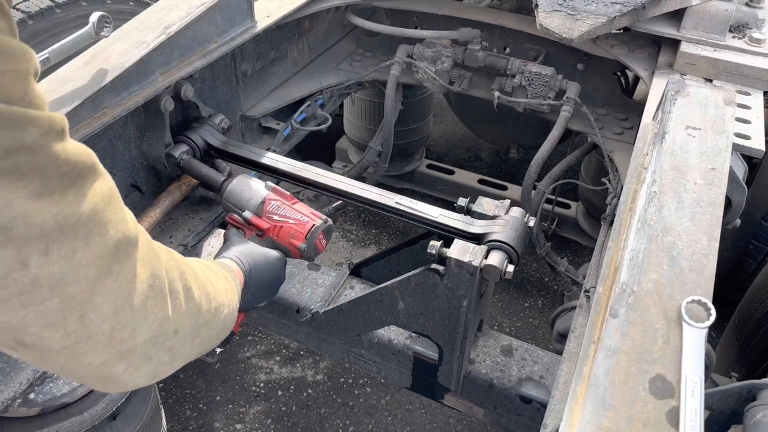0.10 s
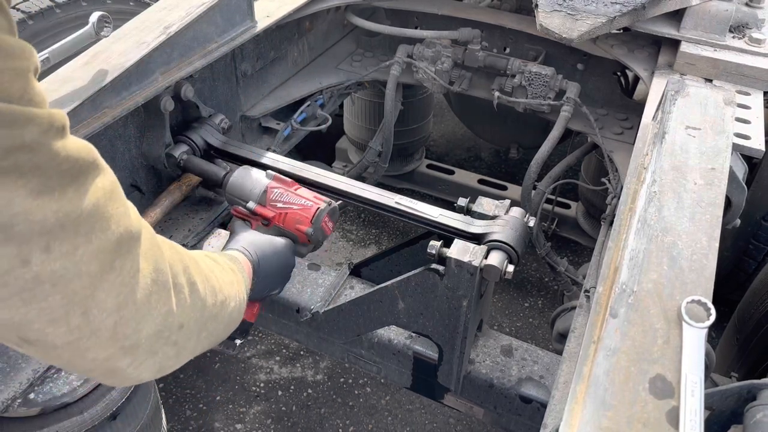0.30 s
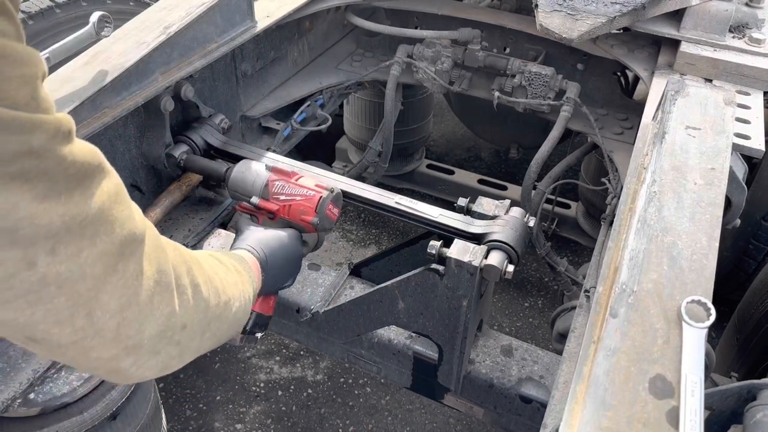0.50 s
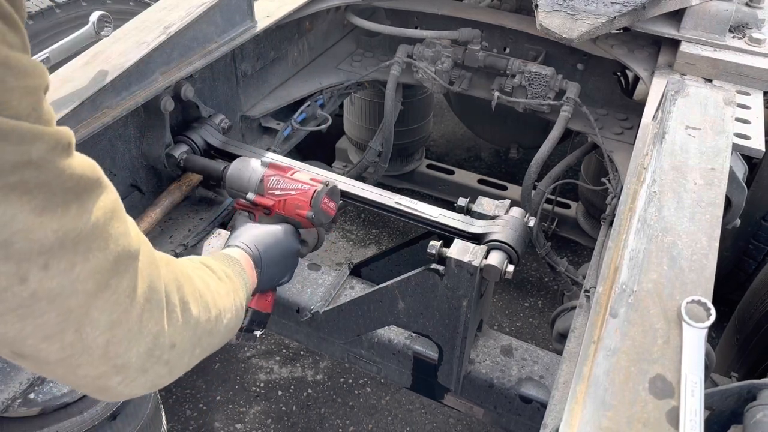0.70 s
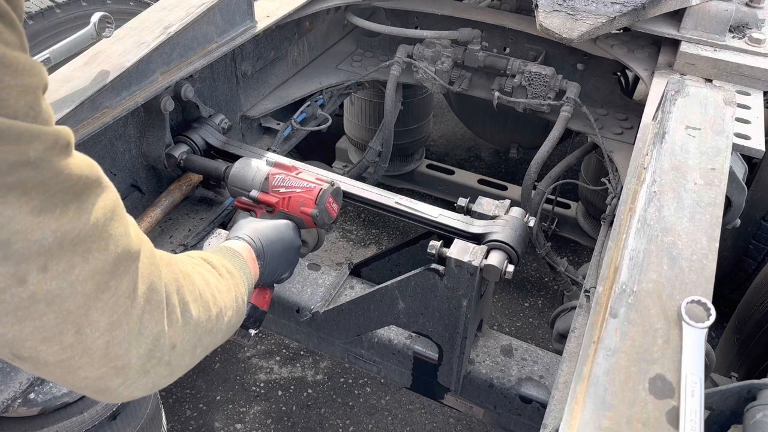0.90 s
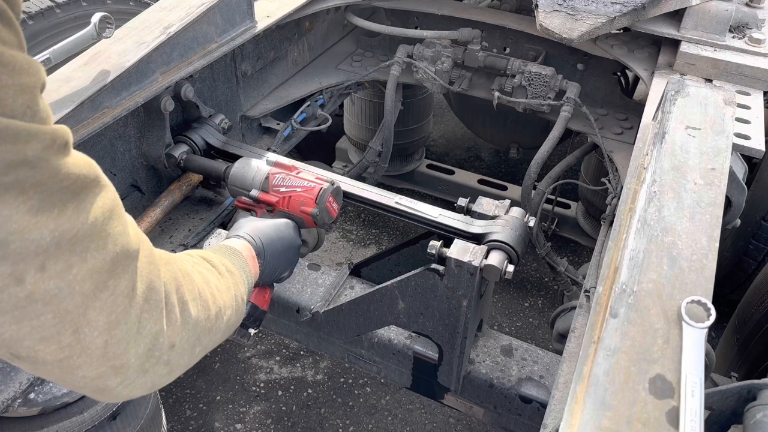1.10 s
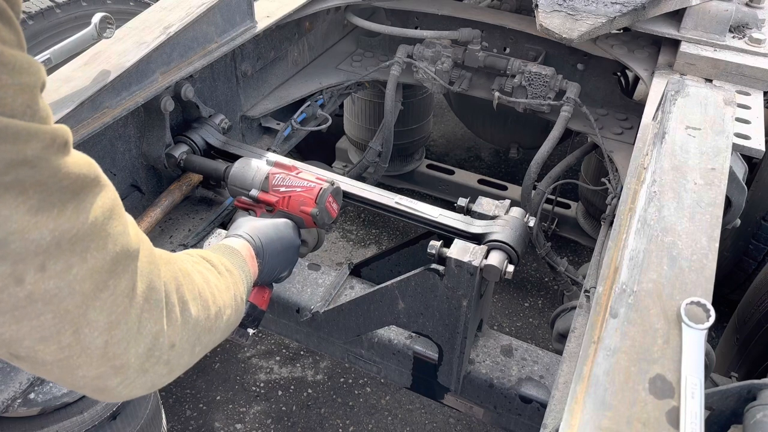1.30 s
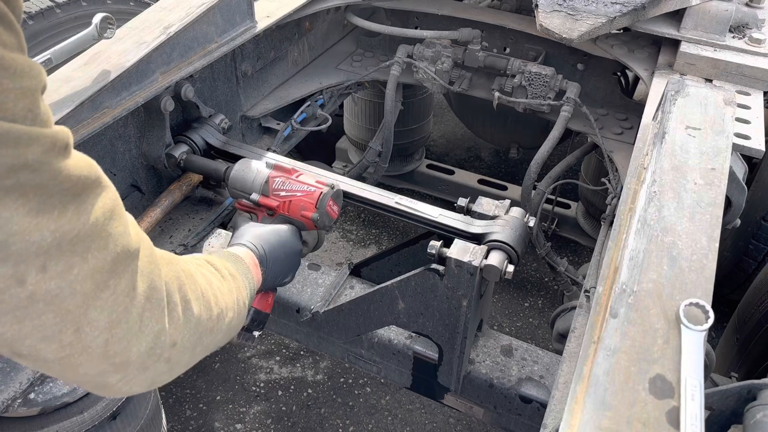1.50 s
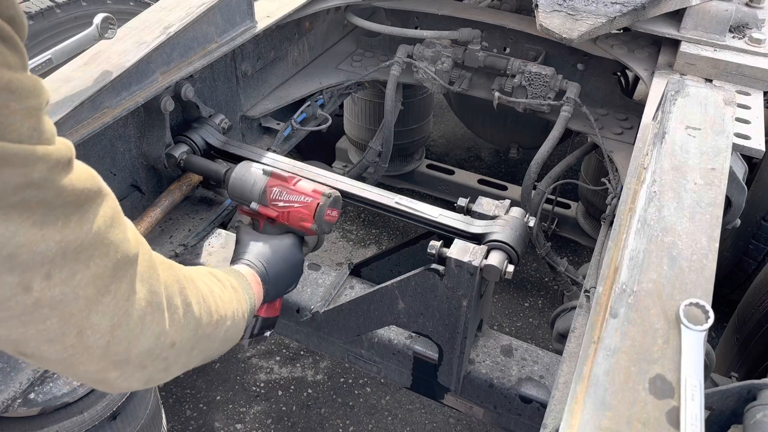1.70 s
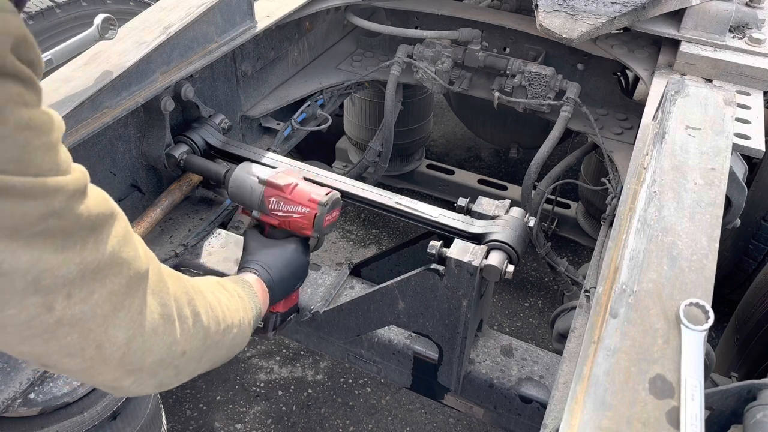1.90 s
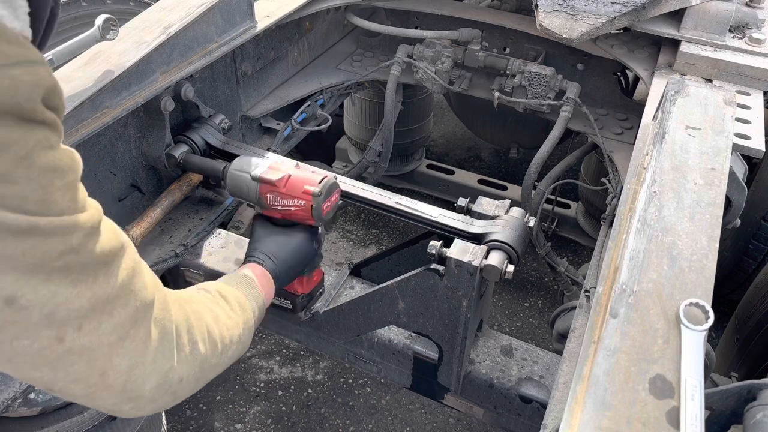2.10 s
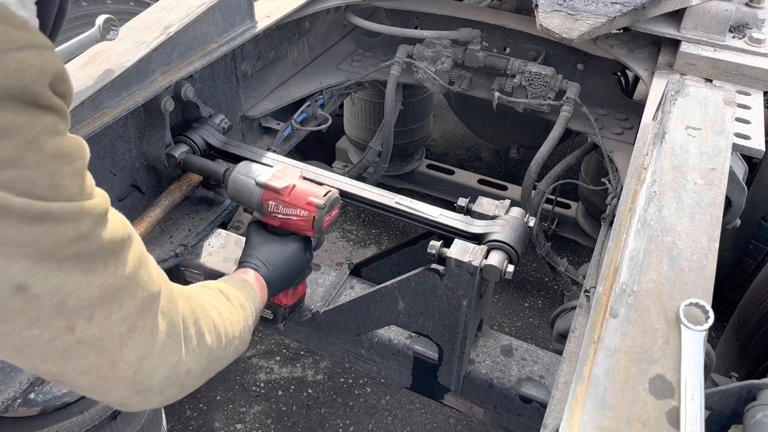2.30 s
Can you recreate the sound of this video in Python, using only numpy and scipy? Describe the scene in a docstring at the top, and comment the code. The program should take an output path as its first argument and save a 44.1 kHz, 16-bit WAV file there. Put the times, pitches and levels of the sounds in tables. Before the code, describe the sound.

A cordless impact wrench fires one short hammering burst on steel, amid socket knocks and wind

```python
"""Outdoors, a socket knocks against a bolt on a steel truck frame as wind buffets the microphone.
After a faint trigger or motor noise a cordless impact wrench whines up and lands seven hammer blows;
looser knocks and gusts follow. A far hum of air and a thin steady whine run throughout. Wind, air and
frame rattle are banded noise; steel and frame are decaying sines; the motor is a beating tone with
hissing gear resonances."""
import sys
import numpy as np
from scipy import signal
from scipy.fft import rfft, irfft
from scipy.io import wavfile

SR = 44100
rng = np.random.default_rng(int(sys.argv[2]) if len(sys.argv) > 2 else 0)


def put_to_file(sound):
    """Save the sound as 16-bit audio at rate SR, in the file named by the first command-line argument."""
    columns = np.atleast_2d(sound).T  # one column per channel
    safe = np.clip(columns, -1, 1)
    whole_steps = np.round(safe * 32767)
    wavfile.write(sys.argv[1], SR, whole_steps.astype(np.int16))


def invert_db(x):
    """Field ratio 10**(x/20) for x, a level in decibels (scalar or array-like)."""
    u = np.asarray(x, float) / 20
    return 10 ** u


N = 110250
T = np.arange(N) / SR

# socket knocks, and a faint trigger or motor noise at 0.748 s, made the same way:
# (time [s], relative level [dB], brightness [dB/octave], relative clear ring [dB])
SMALL_HITS = [(.002, -35.5, -3, 1), (0.015, -28, 3, -23), (.079, -27.5, 1, -12), (.2702, -14, -0.35, -48),
              (0.322, -26.5, 0.5, -21), (.379, -28.5, -4.5, -46), (0.445, -43.5, -1.5, -33),
              (.607, -31, -7.5, -38.5), (0.748, -43, 5.5, -19.5), (1.403, -44, 3.5, -24.5),
              (1.781, -21.5, 4, -11.5), (1.852, -48.5, 3, -7), (2.101, -41, 0, -42),
              (2.1197, -28, -0.5, -17.5), (2.157, -47, -4.5, -38), (2.462, -41.5, -3.5, -30)]
# hammer blows: (time [s], relative level [dB], relative thud [dB])
BLOWS = [(0.98, -11.5, -34), (1.0026, -8.5, -28.5), (1.0319, -8.5, -24.5), (1.059, -9.5, -27),
         (1.082, -11.5, -23), (1.11, -10, -33), (1.1368, -10, -23.5)]
CLATTER_DB, CLATTER_HZ = 2, 262   # loose parts make the ringing grainy


def rms_one(x):
    """Scale to rms 1."""
    return x / np.sqrt(np.mean(x ** 2) + 1e-20)


def at_hz(points, hz):
    """Read a table on a log-frequency axis."""
    table_hz, value = np.transpose(points)
    return np.interp(np.log(hz), np.log(table_hz), value)


def drift(rate_hz):
    """Low-passed noise of spread 1, computed at every 40th sample and interpolated."""
    hop = 40
    r = np.exp(-2 * np.pi * rate_hz * hop / SR)
    white = rng.standard_normal(N // hop + 1002)
    slow = signal.lfilter([1], [1, -2 * r, r * r], white)[1000:]
    return np.interp(np.arange(N) / hop, np.arange(len(slow)), rms_one(slow))


def clicks(time_s, size):
    """Impulses at given times, over a tiny floor."""
    out = np.zeros(N)
    np.add.at(out, np.clip((np.asarray(time_s) * SR).astype(int), 0, N - 1), size)
    return out + 1e-18


def fade(x, t60_s):
    """Each impulse becomes an exponentially dying envelope."""
    return signal.lfilter([1], [1, -invert_db(-60 / (t60_s * SR))], x)


def ring(x, hz, t60_s):
    """Two-pole resonator: a unit click starts a decaying sine of height 1."""
    r, w = invert_db(-60 / (t60_s * SR)), 2 * np.pi * hz / SR
    return signal.lfilter([0, np.sin(w)], [1, -2 * r * np.cos(w), r * r], x)


def resonance(x, hz, width_hz):
    """Two-pole band-pass with gain near 1 at its peak."""
    r = np.exp(-np.pi * width_hz / SR)
    numerator = np.array([1, 0, -1]) * (1 - r * r) / 2
    return signal.lfilter(numerator, [1, -2 * r * np.cos(2 * np.pi * hz / SR), r * r], x)


def bands(low_hz, count, alike=None):
    """Third-octave stereo noise: yields centre and noise; mid/side weights set channel correlation."""
    # channel correlation: (frequency [Hz], correlation [-1..1])
    likeness = [(300, 0.65), (1000, 0.31), (3500, 0.52), (8000, 0.56), (15000, 0.21)]
    edges_hz = low_hz * 2 ** (np.arange(count + 1) / 3)
    white = rng.standard_normal((2, 2, N + 4000))
    for k in range(count):
        sos = signal.butter(2, edges_hz[k:k + 2], "band", fs=SR, output="sos")
        mid, side = signal.sosfilt(sos, white[k % 2])[:, -N:]   # neighbours use separate noise
        hz = np.sqrt(edges_hz[k] * edges_hz[k + 1])
        c = np.clip(at_hz(likeness, hz) if alike is None else alike, -1, 1)
        yield hz, np.sqrt(1 + c) * mid + np.sqrt(1 - c) * side * [[1], [-1]]


def thin_whine():
    """Narrow steady lines high up, with slightly wavering level and phase."""
    # lines: (frequency [Hz], level [dB], level waver [dB])
    lines = [(8540, -79, 2.8), (14360, -68.5, 2.3)]
    out = 0
    for hz, db, waver_db in lines:
        level = invert_db(db + waver_db * drift(33))
        out = out + level * np.sin(2 * np.pi * hz * T + 0.19 * drift(20))
    return out


def wind():
    """Turbulence at the microphone: lumpy low noise under the gusts, and lone short wave packets."""
    # gust envelope: (time [s], level [dB])
    gusts = [(0, -39), (.06, -39.5), (.12, -33.5), (.17, -40.5), (.23, -26), (.36, -19.5), (.43, -25),
             (.5, -19), (.56, -21.5), (.62, -16.5), (.7, -26), (.76, -36.5), (.86, -38.5), (.95, -31),
             (1.1, -43.5), (1.3, -31.5), (1.38, -40.5), (1.48, -44.5), (1.55, -32), (1.62, -38),
             (1.78, -31.5), (1.88, -31.5), (1.95, -44.5), (2.02, -36), (2.12, -34), (2.25, -43.5),
             (2.5, -51.5)]
    # wind spectrum: (frequency [Hz], relative level [dB])
    spectrum = [(22, -38.5), (32, -18.5), (54, 0.5), (125, -4.5), (185, -12), (275, -13.5), (700, -66)]
    # single buffets: (time [s], peak level [dB], pitch [Hz])
    buffets = [(0.355, -10.5, 142), (0.372, -11.5, 184.5), (0.529, -5, 117), (0.585, -4, 200.5),
               (1.534, -22.5, 140), (1.744, -19.5, 127), (2.11, -16.5, 201)]
    lumps_db, lumps_hz, alike = 4.5, 27, 0.78
    brightens = 0.065   # dB per octave for each dB of gust
    buffet_cycles = 2.1

    lumps = drift(lumps_hz)
    gust_db = np.interp(T, *np.transpose(gusts))
    tilt = brightens * (gust_db - gust_db.mean())
    noise = 0
    for hz, x in bands(22.18, count=15, alike=alike):
        lump_db = lumps_db * (0.33 * lumps + drift(hz / 8))
        noise = noise + invert_db(at_hz(spectrum, hz) + tilt * np.log2(hz / 90) + lump_db) * x
    out = rms_one(noise) * invert_db(gust_db)
    for time_s, db, hz in buffets:
        progress = np.clip((T - time_s) * hz / buffet_cycles, 0, 1)
        window = np.sin(np.pi * progress) ** 2
        out = out + invert_db(db) * window * np.sin(2 * np.pi * hz * (T - time_s))
    return out


def struck(time_s, size, again_s, again_db, t60_s, crack_db):
    """Noise envelope of hits that each sound twice: a dying ring plus a short crack."""
    hit = clicks(time_s, size[0]) + invert_db(again_db) * clicks(again_s, size[1])
    return fade(hit, t60_s) + invert_db(crack_db) * fade(hit, 0.014)


def air_and_rattle():
    """One noise bank carries the far air and the dense rattle that dies by band after each event."""
    # far air spectrum: (frequency [Hz], relative level [dB])
    air_spectrum = [(300, -1), (564, -6.5), (1080, -11), (3680, -30.5), (8100, -32), (9700, -31),
                    (11500, -51), (16000, -65)]
    # small hit spectrum: (frequency [Hz], relative level [dB])
    small_spectrum = [(300, -3.5), (900, -4), (2200, -14), (5250, -28.5), (9500, -27.5), (12000, -66),
                      (15000, -32)]
    # small hit decay: (frequency [Hz], t60 [s])
    small_decay = [(300, 0.2), (1000, 0.14), (3000, 0.14), (8000, 0.079), (16000, 0.017)]
    # blow spectrum: (frequency [Hz], relative level [dB])
    blow_spectrum = [(300, 6.5), (500, -6), (1280, -5), (3600, -6.5), (4800, -7), (6330, -11), (8000, -10),
                     (9500, -4), (11500, -26), (15000, -9)]
    # blow decay: (frequency [Hz], t60 [s])
    blow_decay = [(500, 0.28), (1500, .2), (4000, 0.15), (8000, 0.11), (16000, 0.016)]
    air_db, air_patchy_db = -51.5, 3
    small_gain_db, again_s, again_db, small_crack_db = 2.5, 0.0068, -4, 1.5   # each sounds again
    blow_gain_db, rebound_s, rebound_db, blow_crack_db = -10.5, 0.0032, -5, 9   # hammer rebounds once
    attack_cycles = 0.23   # a band swells over cycles of its own

    small_s, small_db, tilt, _ = np.transpose(SMALL_HITS)
    blow_s, blow_db, _ = np.transpose(BLOWS)
    repeats_s = small_s + again_s * rng.uniform(0.79, 1.4, len(small_s))
    rebounds_s = blow_s + rebound_s * rng.uniform(0.67, 1.9, len(blow_s))
    rattle, air = 0, 0
    for hz, x in bands(266.1, count=18):
        patches_db = air_patchy_db * drift(2.1)
        air = air + invert_db(at_hz(air_spectrum, hz) + patches_db) * x[:, ::-1]   # reversed in time

        size_db = small_db + small_gain_db + tilt * np.log2(hz / 1500) + at_hz(small_spectrum, hz)
        size = invert_db(size_db + rng.normal(0, 2.74, (2, len(small_s))))
        small = struck(small_s, size, repeats_s, again_db, at_hz(small_decay, hz), small_crack_db)

        size_db = blow_db + blow_gain_db + at_hz(blow_spectrum, hz)
        size = invert_db(size_db + rng.normal(0, 2.34, (2, len(blow_s))))
        blow = struck(blow_s, size, rebounds_s, rebound_db, at_hz(blow_decay, hz), blow_crack_db)

        r = np.exp(-2 * hz / (attack_cycles * SR))
        envelope = signal.lfilter([(1 - r) ** 2], [1, -2 * r, r * r], small + blow)
        rattle = rattle + envelope * x
    return invert_db(air_db) * rms_one(air), rattle * invert_db(CLATTER_DB * drift(CLATTER_HZ))


def thuds():
    """Each blow and small hit excites the frame's low modes a moment later, band-limited to sound soft."""
    # frame modes: (frequency [Hz], relative level [dB], t60 [s])
    frame_modes = [(140, -8, 0.56), (176.25, -7, 0.73), (220.1, 2, 0.2), (251.4, 6.5, 0.21),
                   (293.8, 11, 0.073), (468, 7, 0.15)]
    delay_s, blow_thud_db, small_thud_db, soft_hz = 0.00536, -2, -17.5, 600
    blow_s, _, thud_db = np.transpose(BLOWS)
    small_s, small_db = np.transpose(SMALL_HITS)[:2]
    time_s = np.r_[blow_s, small_s] + delay_s
    db = np.r_[thud_db + blow_thud_db, small_db + small_thud_db]
    luck_db = rng.normal(0, 2, (len(time_s), len(frame_modes)))
    out = 0
    for k, (hz, level_db, t60_s) in enumerate(frame_modes):
        out = out + ring(clicks(time_s, invert_db(db + level_db + luck_db[:, k])), hz, t60_s)
    return signal.sosfilt(signal.butter(2, [110, soft_hz], "band", fs=SR, output="sos"), out)


def steel(time_s, db, tilt):
    """Bolt, socket and frame modes: each event and its three chatters vary strength and sign per mode."""
    # steel modes: (nominal frequency [Hz], relative level [dB], t60 [s])
    steel_modes = [(1003, -17, 0.19), (1343, -10.5, 0.25), (1482, -6.5, 0.15), (1670, -8, 0.12),
                   (1870, -6.5, 0.093), (2283, -3.5, 0.1), (3005, -6, 0.17), (3640, 1, 0.064),
                   (4080, -6.5, 0.09), (4040, -12.5, 0.086), (4600, -2, 0.091), (4880, 0.5, .05),
                   (5410, -6, 0.067), (9270, 5.5, 0.05)]
    # the loose socket seats anew each time, shifting the modes, and chatters after it
    seat_detune, chatter_s, chatter_db = 0.008, 0.017, -7   # detune as a fraction of frequency
    hz, level_db, t60_s = np.transpose(steel_modes)[:, :, None]
    t = np.arange(SR // 4) / SR
    out = np.zeros(N + SR)
    for when_s, hit_db, slope in np.broadcast(time_s, db, tilt):
        pitch_hz = hz * (1 + seat_detune * rng.normal(0, 1, hz.shape))
        decay = invert_db(hit_db + level_db + slope * np.log2(hz / 1500) - 60 * t / t60_s)
        onset = 1 - np.exp(-t * 1200.0)
        modes = decay * onset * np.sin(2 * np.pi * pitch_hz * t)
        chatters = [(chatter_s * rng.random(), chatter_db) for _ in range(3)]
        for late_s, gain_db in [(0, 0.0092)] + chatters:
            i = int((when_s + late_s) * SR)
            strength = rng.uniform(0.47, 1, len(hz)) * rng.choice([-1, 1], len(hz))
            out[i:i + len(t)] += invert_db(gain_db) * strength @ modes
    return out[:N] * invert_db(CLATTER_DB * drift(CLATTER_HZ))


def motor():
    """The chopper tone and its octave beat at the motor's speed; the gears hiss in resonances."""
    # motor run: (time [s], electrical speed [Hz], relative level [dB])
    run = [(.862, 54, -53), (0.871, 52.6, -4.5), (0.932, 79, 3), (.975, 149, 6.5), (1.001, 157.7, -4),
           (1.15, 158, -4), (1.17, 140, -19)]
    # gear noise envelope: (time [s], relative level [dB])
    gear_envelope = [(.862, -99), (.88, -54.5), (.94, -62), (.955, -42.5), (.978, -40)]
    # gear resonances: (frequency [Hz], width [Hz], relative level [dB])
    gear_peaks = [(2675, 900, -1.5), (5700, 13000, -3), (10370, 7700, -22.5)]
    chopper_hz, whine_db, octave_db, octave_depth = 7715, -39.5, -43.5, 0.5

    time_s, speed_hz, db = np.transpose(run)
    turn = 2 * np.pi * np.cumsum(np.interp(T, time_s, speed_hz)) / SR
    chop = 2 * np.pi * chopper_hz * T
    tone = invert_db(whine_db) * 2 * np.cos(turn) * np.sin(chop)
    octave_level = invert_db(octave_db + 2.5 * drift(84)) * (1 + octave_depth * np.cos(turn))
    whine = tone + octave_level * np.sin(2 * chop)
    whine = whine * invert_db(np.interp(T, time_s, db, left=-80, right=-80))

    gears = 0
    for hz, width_hz, peak_db in gear_peaks:
        once = resonance(rng.standard_normal(N), hz, width_hz)
        gears = gears + invert_db(peak_db) * rms_one(resonance(once, hz, width_hz))
    gear_db = np.interp(T, *np.transpose(gear_envelope), left=-120) + 2.4 * drift(150)
    return whine + gears * invert_db(gear_db) * (T < time_s[-2])


def scene():
    """All sources together; the tool side is panned left and the right channel of tool and air lags."""
    tool_pan_db, right_lag_s = 2, 0.00007
    ring_gain_db, ring_tilt = -16, -4.5   # blow ring [dB]; small ring is duller [dB/octave]
    air, rattle = air_and_rattle()
    small_s, small_db, tilt, ring_db = np.transpose(SMALL_HITS)
    blow_s, blow_db, _ = np.transpose(BLOWS)
    small_rings = steel(small_s, small_db + ring_db, tilt + ring_tilt)
    blow_rings = steel(blow_s, blow_db + ring_gain_db, 0)
    tool = small_rings + blow_rings + motor() + rattle
    left, right = tool * invert_db([[tool_pan_db / 2], [-tool_pan_db / 2]]) + air
    lag = np.exp(-2j * np.pi * np.fft.rfftfreq(N, 1 / SR) * right_lag_s)
    right = irfft(rfft(right) * lag, N)
    return np.array([left, right]) + thuds() + wind() + thin_whine()


def roll_off(x):
    """The treble ends steeply here."""
    return signal.sosfilt(signal.butter(12, 16660, fs=SR, output="sos"), x)


def record(dry):
    """A steep low-pass cuts the top: 50 dB down from 16.3 kHz."""
    low_pass = signal.cheby2(10, 50, 16300, fs=SR, output="sos")
    mix = signal.sosfilt(low_pass, dry)
    return roll_off(mix)


dry = scene()
out = record(dry)
put_to_file(out)
```